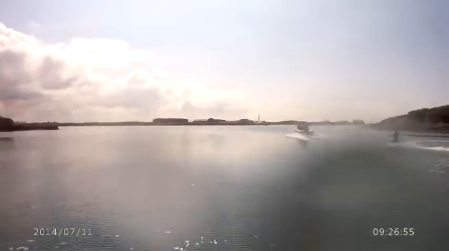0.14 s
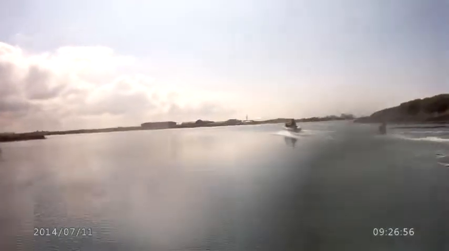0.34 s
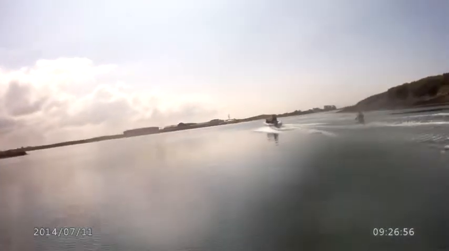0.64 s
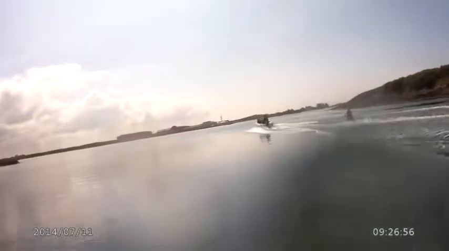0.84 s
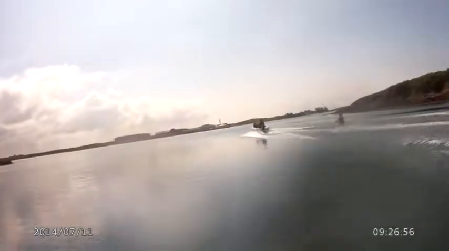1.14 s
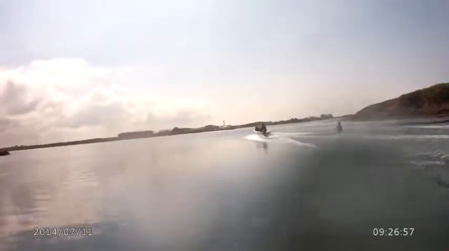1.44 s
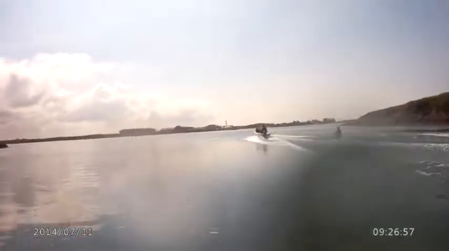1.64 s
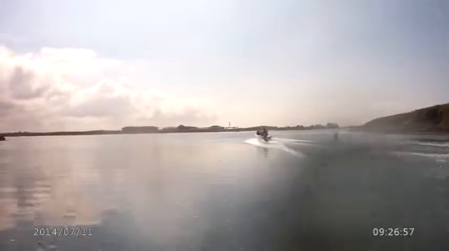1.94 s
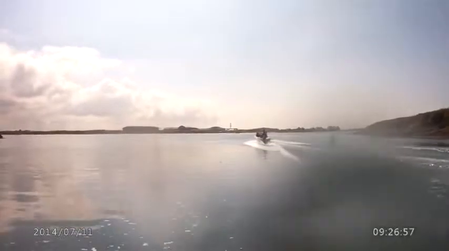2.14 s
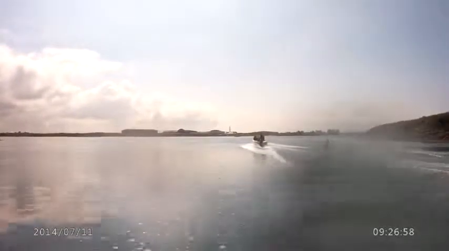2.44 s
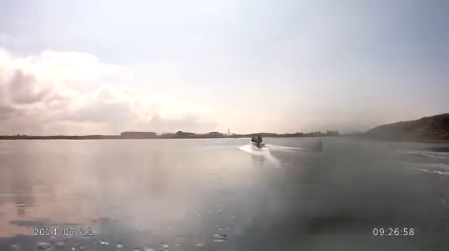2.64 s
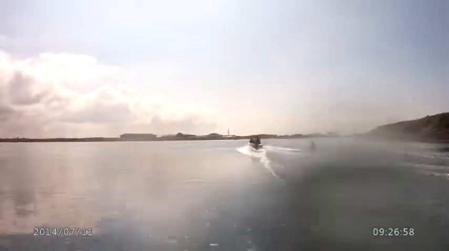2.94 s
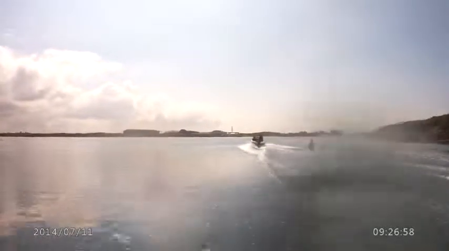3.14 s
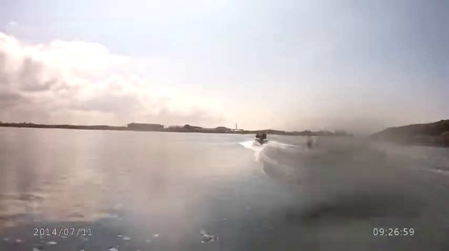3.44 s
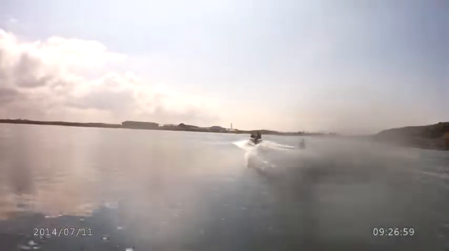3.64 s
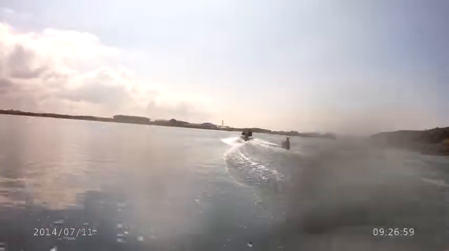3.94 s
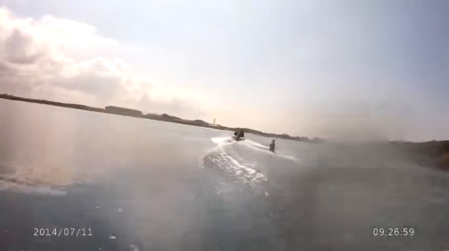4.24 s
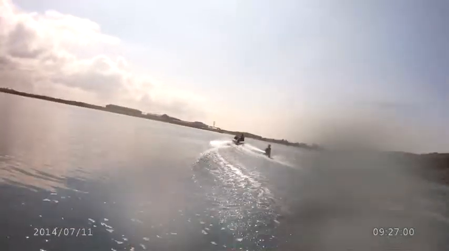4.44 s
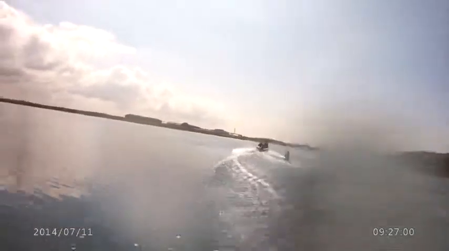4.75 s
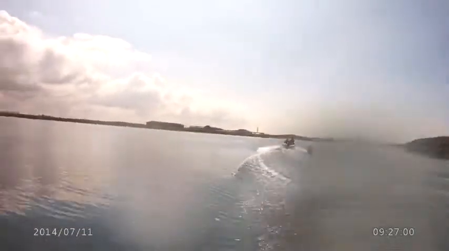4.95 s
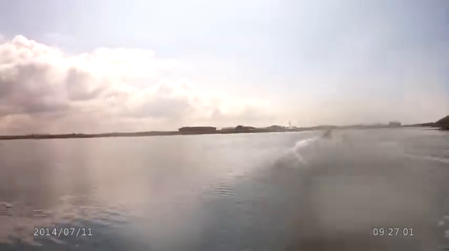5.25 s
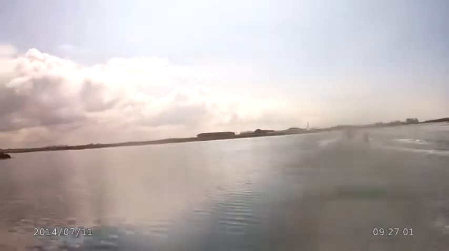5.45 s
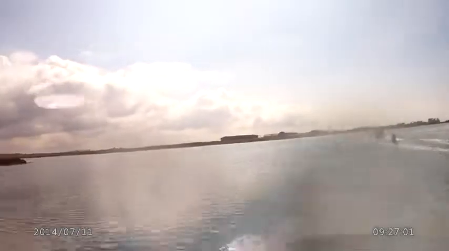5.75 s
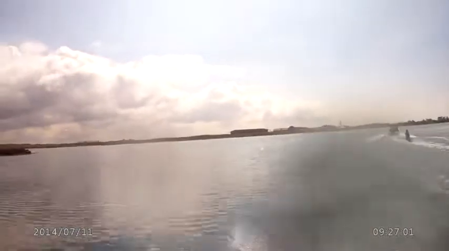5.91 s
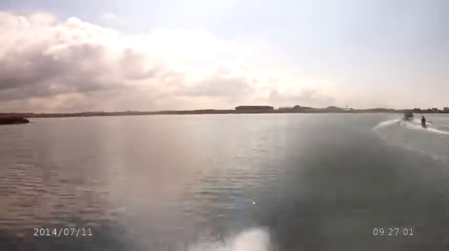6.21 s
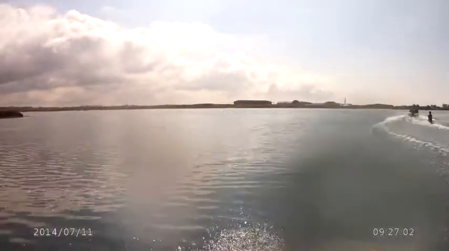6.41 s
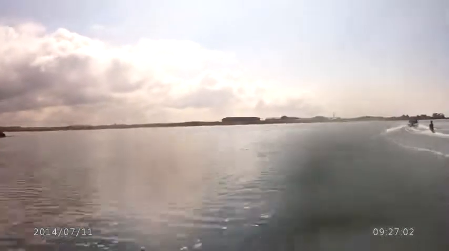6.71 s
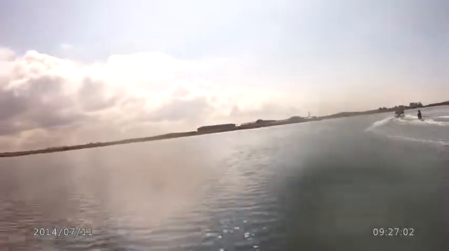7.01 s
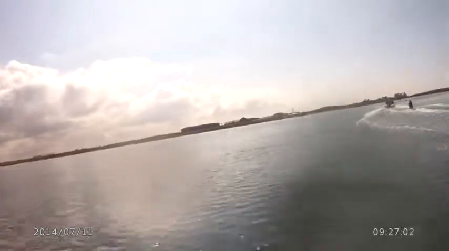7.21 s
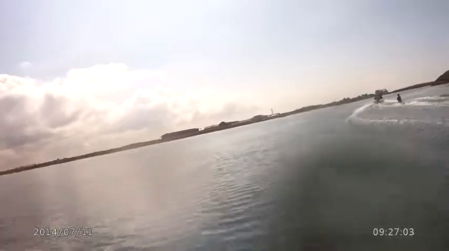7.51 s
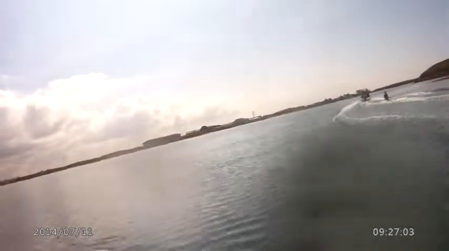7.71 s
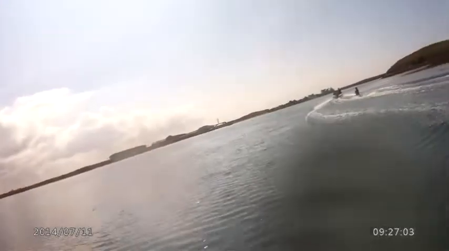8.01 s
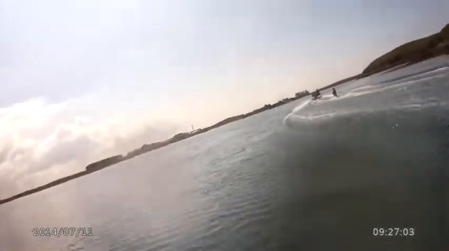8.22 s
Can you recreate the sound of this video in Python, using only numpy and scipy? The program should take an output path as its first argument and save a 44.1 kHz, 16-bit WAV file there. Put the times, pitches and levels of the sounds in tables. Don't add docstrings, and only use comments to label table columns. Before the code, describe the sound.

A microphone sealed in a hard camera case rides on a jet-driven watercraft crossing open water, so everything is close, boxy and slightly overloaded. From 0 s a low, throbbing engine drone buzzes at about sixty pulses a second, over lumpy wind rumble and a narrow spray hiss. It rises slightly, then sags until about 2.2 s, with light ticks and scattered knocks. Around 2.4 to 2.8 s the revs blip, dip and jump; the drone becomes louder and rougher, and plastic clacking thickens. It holds with small wavers from 3 to 6 s, with light hull thuds near 3.6 and 5.2. Rattling nearly stops for an instant at 5.9. Revs ease around 6.3, the roar drops briefly near 6.4, and the hardest thud lands at 6.5. The engine then surges, climbing steadily from 7 s to its highest pitch by 8.4, with latch ticks near 7.6 and another thud near 8.2.

```python
import sys
import numpy as np
from scipy import signal
from scipy.io import wavfile
from scipy.ndimage import uniform_filter1d

SR = 44100
rng = np.random.default_rng(int(sys.argv[2]) if len(sys.argv) > 2 else 0)


def bounce(signal):
    frames = np.transpose(np.atleast_2d(signal))
    limited = np.clip(frames, -1, 1)
    pcm = np.round(limited * 32767).astype(np.int16)
    wavfile.write(sys.argv[1], SR, pcm)


def field_ratio(decibels):
    return 10 ** (np.asarray(decibels, dtype=float) / 20)


N = 369100


def in_time(rows):
    s, *columns = np.transpose(rows)
    return [np.interp(np.arange(N) / SR, s, column) for column in columns]


def rms_one(x):
    return x / np.sqrt(np.mean(x ** 2) + 1e-20)


def drift(rate_hz):
    r = np.exp(-2 * np.pi * rate_hz / SR)
    noise = rng.standard_normal(N + SR)
    return rms_one(signal.lfilter([1], [1, -2 * r, r * r], noise)[SR:])


def resonate(x, modes):
    out = 0
    for k, (hz, width_hz, db) in enumerate(modes):
        r = np.exp(-np.pi * width_hz / SR)
        zeros = [(1 - r * r) / 2, 0, (r * r - 1) / 2]
        poles = [1, -2 * r * np.cos(2 * np.pi * hz / SR), r * r]
        out = out + (-1) ** k * field_ratio(db) * signal.lfilter(zeros, poles, x + 1e-18)
    return out


def lifted(hz, centre_hz, width_hz, db):
    return field_ratio(db) / np.sqrt(1 + (2 * (hz - centre_hz) / width_hz) ** 2)


def bumps(events, width_s):
    s = np.arange(N) / SR
    return sum(height * np.exp(-((s - at) / width_s) ** 2) for at, height in events)


def buffet(thud_db):
    # (frequency [Hz], width [Hz], level [dB])
    wind_modes = [(59, 85, -3.5), (133, 84, 0.5), (203, 51, 2.5)]
    wind = rng.standard_normal(N)
    thud = (field_ratio(thud_db) - 1) * resonate(wind, wind_modes[:1])
    gusts = field_ratio(-22 + 2.2 * drift(7))
    return gusts * rms_one(resonate(wind, wind_modes) + thud)


def spray(spray_db):
    # (frequency [Hz], width [Hz], level [dB])
    cavity_modes = [(3432, 235, 18), (5340, 510, 4), (5650, 680, 1.5), (9000, 830, -15)]
    flicker = field_ratio(spray_db + 1.67 * drift(90.0))
    return flicker * rms_one(resonate(rng.standard_normal(N), cavity_modes))


def hardest(events, lift_db):
    s, db = np.transpose(events)
    touches = np.zeros(N)
    touches[(s * SR).astype(int)] = field_ratio(db + lift_db)
    return touches


def throws(turns, per_turn, share, db, scatter, late=.3, uneven_db=4.5):
    swings = np.flatnonzero(np.diff(np.floor(per_turn * turns - late)))
    timing, chance, strength = rng.random((4000, 3))[:len(swings)].T
    shift = (scatter * (timing - .5) * SR / 65 / per_turn).astype(int)      # samples, at about 65 turns/s
    at = np.clip(swings + shift, 0, N - 1)
    hits = chance < np.broadcast_to(share, N)[at]
    touches = np.zeros(N)
    touches[at] = hits * field_ratio(db[at] - uneven_db * np.log(np.maximum(strength, .08)))
    return touches


def chatter(touches, modes, burst_s):
    out, flurry = 0, rng.standard_normal(N)
    for k, mode in enumerate(modes):
        r = np.exp(-(mode[0] / 5000) ** 0.15 / (burst_s * SR))
        micro_contacts = flurry * signal.lfilter([1], [1, -r], touches)
        out = out + (-1) ** k * resonate(4.85 * touches + 0.65 * micro_contacts, [mode])
    return out


def rattle(turns, shell_db, latch_db, slack):
    # (frequency [Hz], width [Hz], level [dB])
    shell_modes = [(1950, 230, 1), (4330, 1160, 0.5), (5940, 340, -1.5), (7190, 780, -3.5),
                   (9480, 620, 0.5), (11100, 1300, -5.5), (13700, 2600, -6.5), (15000, 770, -8)]
    latch_modes = [(5990, 570, 6), (8400, 270, 2.5), (4760, 450, 0.5)]
    # (time [s], peak level [dB])
    hard_knocks = [(0.7571, -21), (1.1695, -22), (1.2088, -18), (1.2268, -16), (2.2085, -19), (2.6052, -15),
                   (2.7382, -12), (2.8258, -13.5), (3.1444, -14), (3.1732, -18), (3.3335, -12),
                   (3.3926, -12.5), (3.5966, -13.5), (4.3289, -11), (4.7213, -21), (4.9515, -15.5),
                   (5.1252, -13.5), (5.3106, -18), (5.7449, -16.5), (5.8304, -16), (5.8607, -13),
                   (5.8876, -15), (6.5273, -14), (6.8242, -12.5), (7.0002, -13.5), (7.6246, -40),
                   (7.8903, -17), (8.0846, -11), (8.1971, -35), (8.2717, -15.5)]
    hard_tinks = [(0.2166, -22.5), (0.2399, -21.5), (0.3239, -24.0), (0.4512, -25), (0.7221, -27.0),
                  (1.1239, -25), (1.1609, -22), (1.8946, -17), (2.1283, -27), (2.2205, -28), (2.6588, -22),
                  (3.0107, -28), (3.3417, -30), (3.4211, -22), (3.8189, -19), (4.1485, -21.5),
                  (4.6179, -34), (4.7213, -20), (5.2173, -20), (5.5183, -24.0), (6.4307, -21),
                  (6.8364, -19), (7.552, -29), (7.5663, -19), (7.5798, -20), (7.595, -16), (7.9268, -20),
                  (8.1976, -13)]

    knocks = hardest(hard_knocks, lift_db=8.0)
    free = uniform_filter1d(np.sign(knocks), size=900) < 1e-6
    slams = throws(turns, 0.98, slack, shell_db + 23, scatter=.15, late=.6, uneven_db=1.5)
    knocks = knocks + free * slams
    rebound = uniform_filter1d(np.sign(knocks), size=450) > 1e-6

    fizz_db = shell_db - 8 * slack
    shut_db = 4 * np.cos(2 * np.pi * (turns - .95))
    light = throws(turns, 2, .6, shell_db + 16.0, scatter=.4)
    light = light + throws(turns, 5.5, 0.39, fizz_db + 6.5 - shut_db, scatter=.9)
    shell = knocks + light * ~rebound
    latch = throws(turns, 3.3, .45, latch_db + 16.0, scatter=0.94) + hardest(hard_tinks, lift_db=10.0)
    sizzle_level = field_ratio(fizz_db - 7.5 - shut_db + 4.5 * drift(60.0))
    sizzle = sizzle_level * rms_one(resonate(rng.standard_normal(N), shell_modes))
    return chatter(shell, shell_modes, burst_s=0.002) + chatter(latch, latch_modes, burst_s=0.002) + sizzle


def roar(turns, roar_db):
    # (frequency [Hz], width [Hz], level [dB])
    hull_modes = [(229, 330, -10), (479.3, 69, 7.5), (591, 105, 1), (785, 60, 3.5), (962, 147, -1),
                  (1552, 216, -3), (2086, 290, -7)]
    puff = 1 + 0.81 * np.exp(-3.0 * (turns % 1)) + .4 * np.exp(-3.0 * (2 * turns % 1))
    pump = field_ratio(-8 + 1.8 * drift(1.5)) * np.cos(2 * np.pi * 4 * turns + 0.6 * drift(5.0))
    exhaust = field_ratio(1.7 * drift(44.0)) * rms_one(resonate(puff * rng.standard_normal(N), hull_modes))
    return field_ratio(roar_db - 2.5) * (exhaust + pump)


def crank_orders(crank_hz, turns, levels_db, roar_db, lean_db):
    order_lags = [(1, .19, .27), (2, .17, .11), (3, .065, .1)]
    # (order [1], level [dB])
    upper_orders = [(5, -1.5), (6, -5), (7, 0), (8, 1), (9, 1.5), (11, 1.5), (12, 6.5), (13, 2), (14, -3),
                    (15, 2.5)]
    # (time [s], frequency [Hz], level re roar [dB])
    panel_curve = [(0, 510, -5), (2.3, 505, -12.5), (2.8, 481, -4.5), (4.4, 481, -6), (4.7, 480, -10),
                   (7.2, 480, -8), (7.5, 430, 1), (8.37, 450, 0)]
    panel_width_hz = 30
    seat_box = (950, 40, -8.5)      # Hz, width Hz, dB re roar
    twist_turns_per_db = .0035

    out, planing = 0, np.clip((crank_hz - 63) / 3, 0, 1)
    for (order, slow_lag, fast_lag), db in zip(order_lags, levels_db):
        twist = (order == 3) * twist_turns_per_db * lean_db
        lag = slow_lag + planing * (fast_lag - slow_lag + twist)
        level = np.sqrt(2) * field_ratio(db + 0.6 * drift(12.6))
        out = out + level * np.cos(2 * np.pi * order * (turns - lag) + 0.19 * drift(4.8))

    panel_hz, panel_db = in_time(panel_curve)
    for order, db in upper_orders:
        hz = order * crank_hz
        gain = lifted(hz, panel_hz, panel_width_hz, panel_db) + lifted(hz, *seat_box)
        gain = gain + field_ratio(-14 + .8 * (crank_hz - 69) - 2.5 * (order - 3))
        level = gain * field_ratio(roar_db + db + 2.5 * drift(2.5))
        out = out + level * np.cos(2 * np.pi * order * turns + (1.5 - 0.8 * planing) * drift(5))
    return out


def scene():
    # (time [s], rate [Hz])
    revs_curve = [(0, 60.42), (.45, 62.06), (1.0, 61.66), (1.2, 60.78), (2.2, 59.37), (2.4, 64.6),
                  (2.5, 62.4), (2.7, 68.73), (3.1, 69.6), (3.5, 68.48), (3.68, 67.17), (4.35, 68.57),
                  (4.5, 67.48), (5.9, 68.18), (6.25, 66.18), (7.0, 68.15), (7.5, 71.3), (8.37, 74.6)]
    # (time [s], load [dB], rocking [dB], mount strain [dB])
    mount_curve = [(0, -13.5, 0, 0), (.4, -19.5, 1, 2), (.75, -13, 3, -4), (1.0, -16, 1, -3),
                   (1.3, -11.5, 3, -0.5), (2.2, -11.5, 5, 0.5), (2.5, -11.5, -2, 2), (2.65, -6, 2, -2.5),
                   (3.4, -4.5, 2, 2), (3.65, -4.5, -0.5, 1), (5.0, -8, -0.5, 2.5), (5.65, -7, 3, -2),
                   (6.1, -10, 0, 1), (6.3, -6.5, 0, 2), (6.47, -13, -2, 2), (6.8, -6.5, -4.5, 2.5),
                   (7.25, -8.5, -1.5, -4), (8.37, -5.5, 7, 0.5)]
    # (time [s], exhaust and hull roar [dB], camera shaking [dB], mount slack [0-1])
    ride_curve = [(0, -26, -48.5, 0.16), (1.05, -25, -42.5, 0.13), (1.2, -23.5, -35.5, 0.81),
                  (1.4, -24.5, -46, 0), (2.12, -24, -35.5, 0.34), (2.49, -24.5, -40.5, 0.06),
                  (2.8, -20.5, -36, .7), (3.4, -19, -34, 0.5), (3.63, -21.5, -36.5, 0.5),
                  (4.36, -20, -36, 0.53), (4.66, -22, -37.5, 0.41), (5.75, -23, -37, 0.95),
                  (6.25, -21, -36.5, .5), (6.43, -28, -32, .1), (6.65, -18.5, -32, .5),
                  (7.25, -21, -37.5, 0.34), (7.55, -18, -34.5, .4), (8.37, -18, -32, 0.61)]
    # (time [s], thud over the wind [dB])
    wakes = [
        (2.8, -2),
        (3.6, 3),
        (5.2, 3),
        (6.5, 8),
        (8.2, 4),
    ]
    # (time [s], drop in rattle [dB])
    lulls = [(.15, 7), (.94, 4), (1.55, 5), (2.33, 17), (2.41, 3), (2.5, 11), (2.91, 5), (4.64, 8),
             (4.71, 6), (5.875, 32), (6.38, 11), (6.45, 9), (7.09, -2), (8.32, -1)]

    crank_hz, = in_time(revs_curve)
    load_db, lean_db, strain_db = in_time(mount_curve)
    roar_db, shell_db, slack = in_time(ride_curve)
    s = np.arange(N) / SR
    first_db = -21.5 + lean_db + 0.5 * drift(4.3)
    third_db = -12 + strain_db + 0.9 * drift(3.7)
    spray_db = -31.5 - 1.1 * s + 0.79 * (roar_db - roar_db[0])
    latch_db = -43 + 0.56 * (shell_db - shell_db.mean()) - 1.9 * slack + 1.75 * drift(2.4)
    hush_db = bumps(lulls, width_s=0.023)
    shell_db, latch_db = shell_db - hush_db, latch_db - hush_db
    turns = np.cumsum(crank_hz + .3 * drift(4.0)) / SR

    air_and_water = buffet(bumps(wakes, width_s=0.13)) + spray(spray_db)
    camera = rattle(turns, shell_db, latch_db, np.clip(slack, 0, 1))
    orders = crank_orders(crank_hz, turns, [first_db, load_db, third_db], roar_db, lean_db)
    return (air_and_water + camera + roar(turns, roar_db) + orders)[None]


def roll_off(x):
    return signal.sosfilt(signal.butter(12, 15730, fs=SR, output="sos"), x)


def record(dry):
    # (frequency [Hz], width [Hz], depth [0-1])
    port_dips = [(3850, 250, .4), (7890, 260, .8), (11880, 300, .65), (13700, 300, .35), (14400, 450, .6)]
    ceiling, knee = .97, 12
    x = field_ratio(0.7) * dry
    x = x / (1 + np.abs(x / ceiling) ** knee) ** (1 / knee)
    for hz, width_hz, depth in port_dips:
        x = x - depth * resonate(x, [(hz, width_hz, 0)])
    x = signal.sosfilt(signal.cheby2(6, 30, 15950, fs=SR, output="sos"), x)
    return roll_off(x)


dry = scene()
out = record(dry)
bounce(out)
```